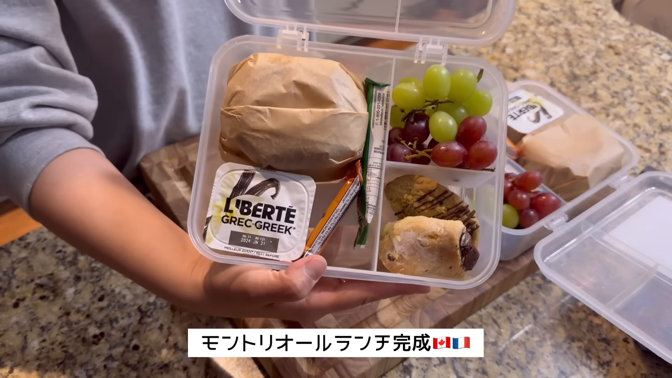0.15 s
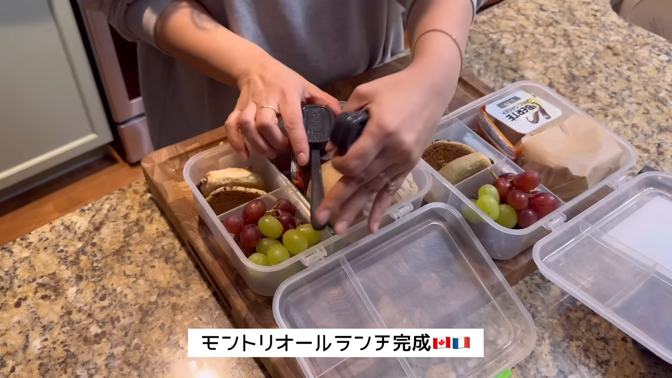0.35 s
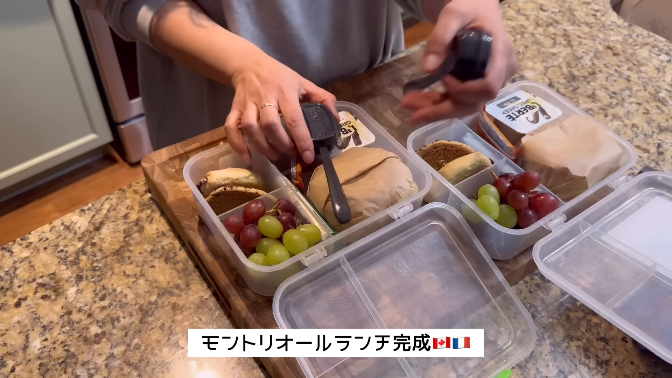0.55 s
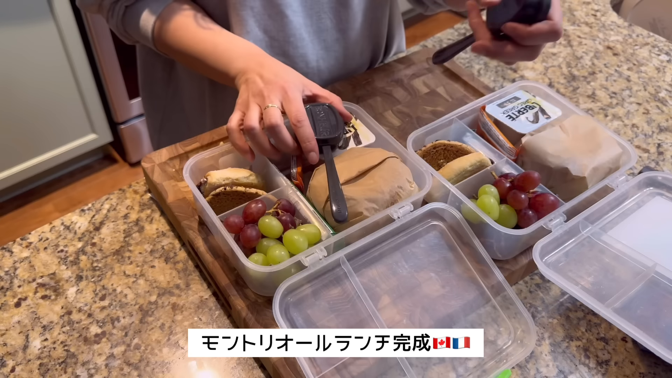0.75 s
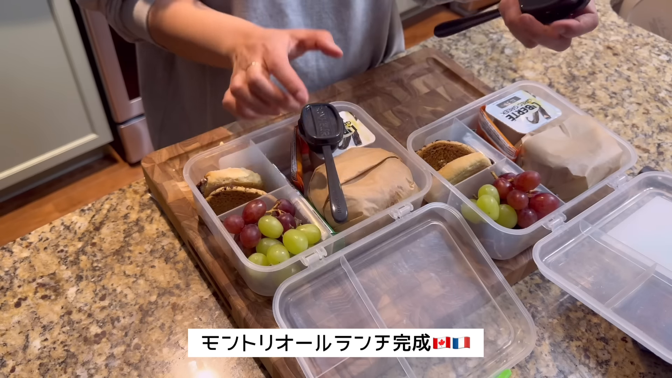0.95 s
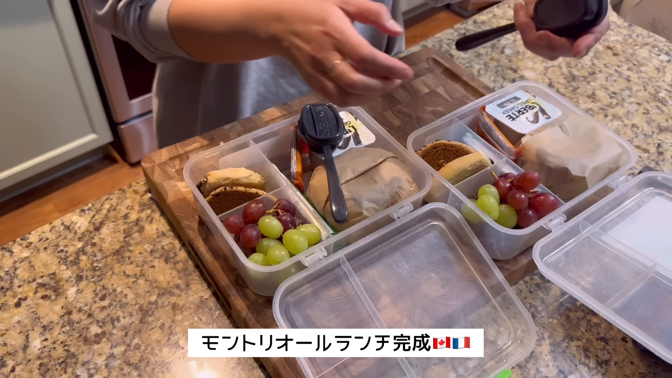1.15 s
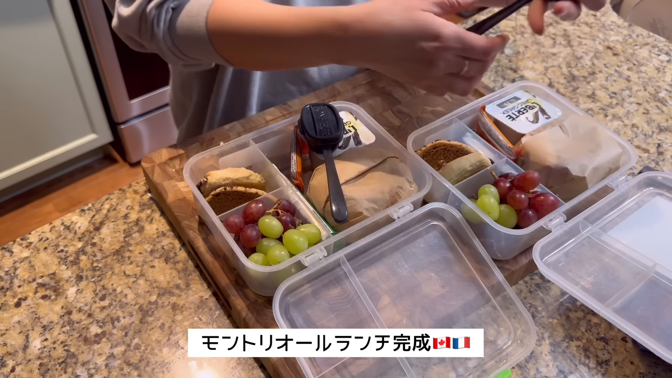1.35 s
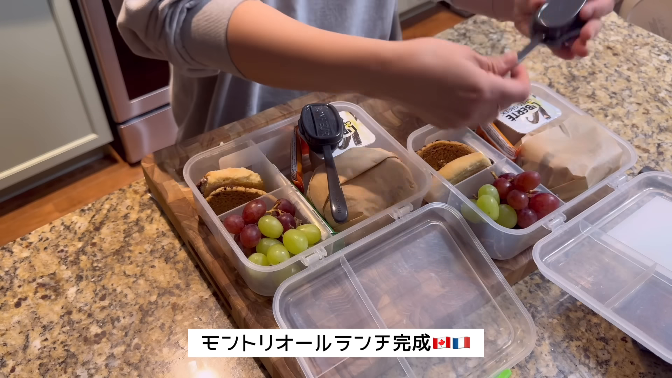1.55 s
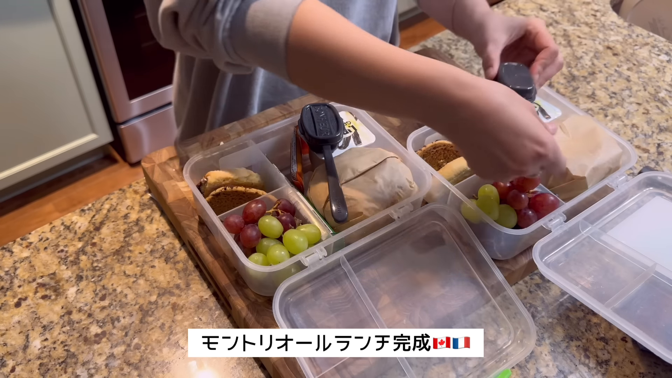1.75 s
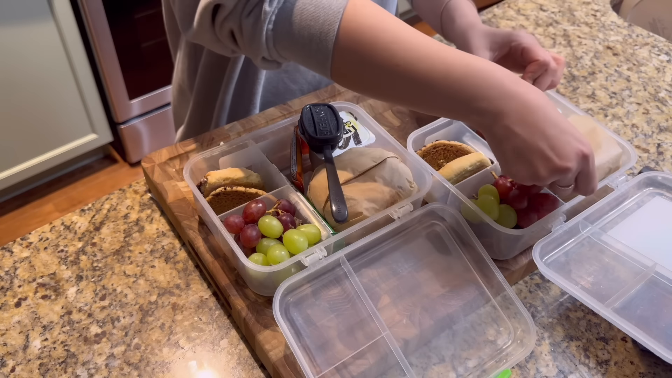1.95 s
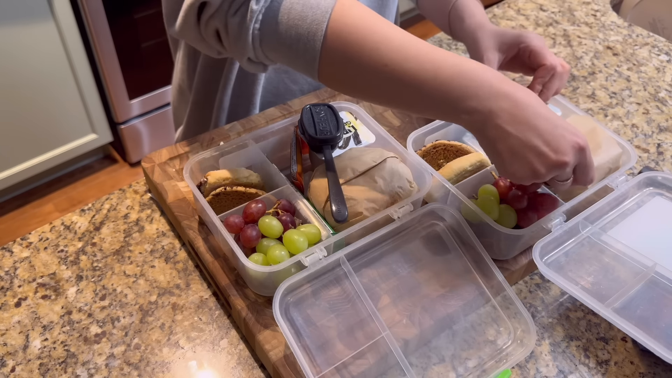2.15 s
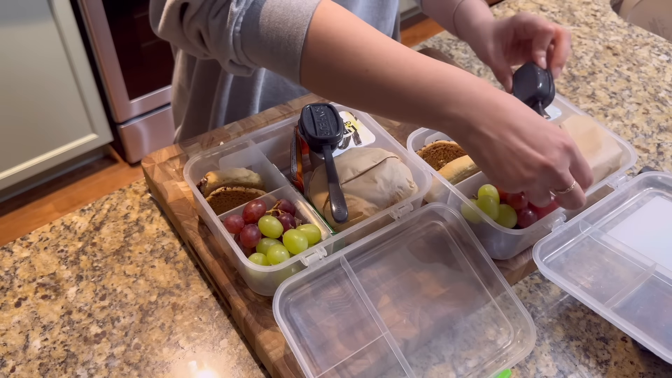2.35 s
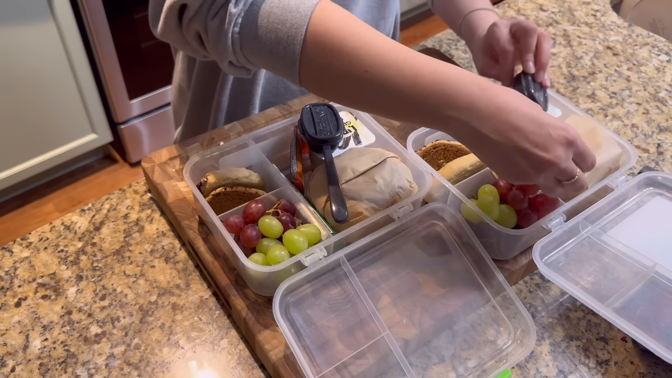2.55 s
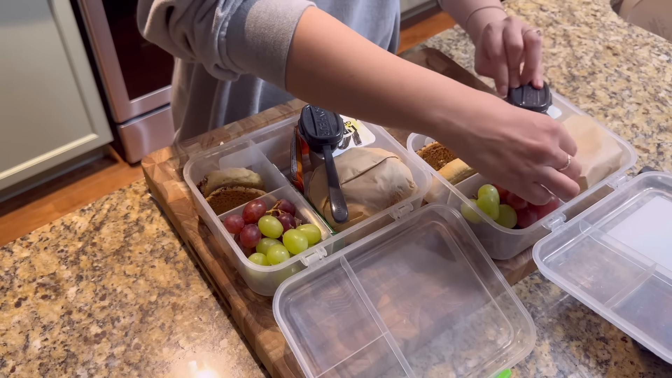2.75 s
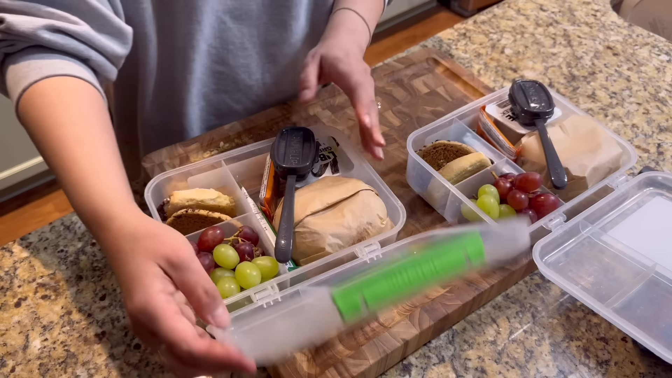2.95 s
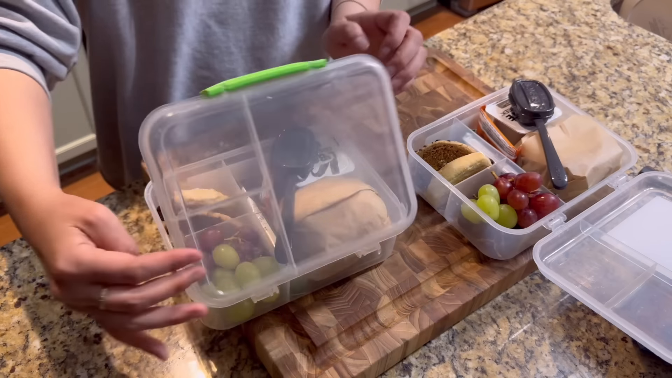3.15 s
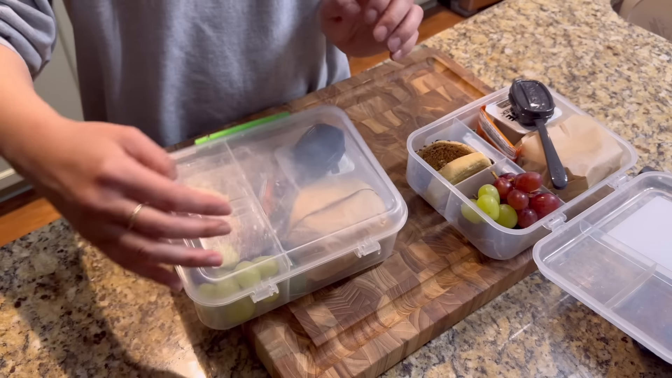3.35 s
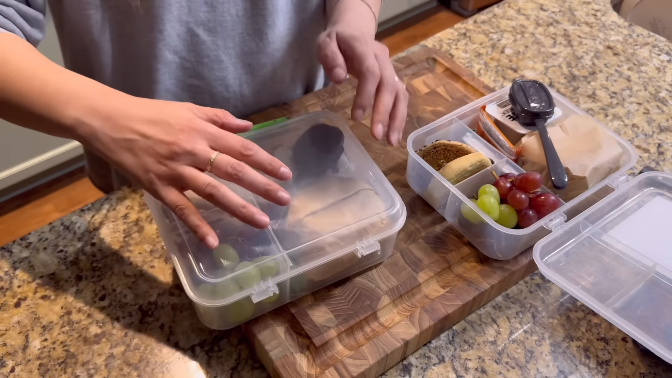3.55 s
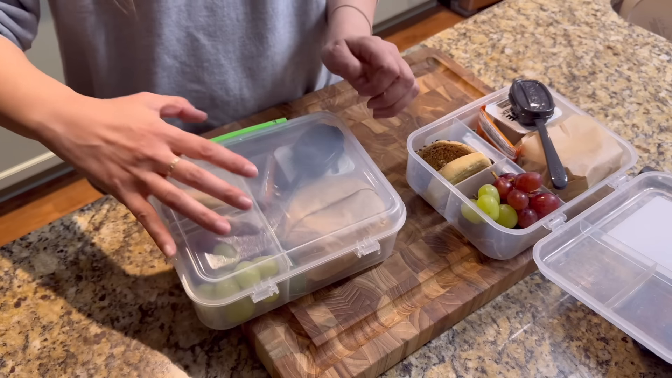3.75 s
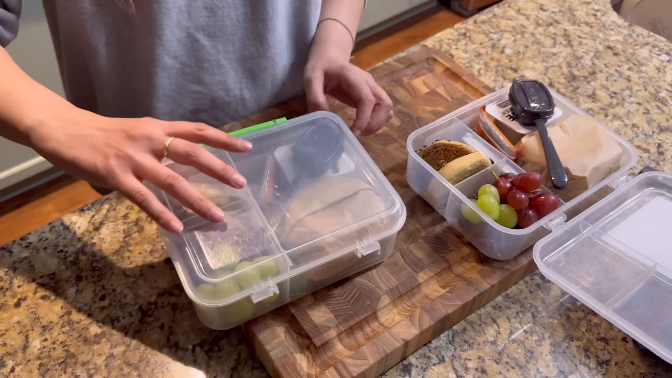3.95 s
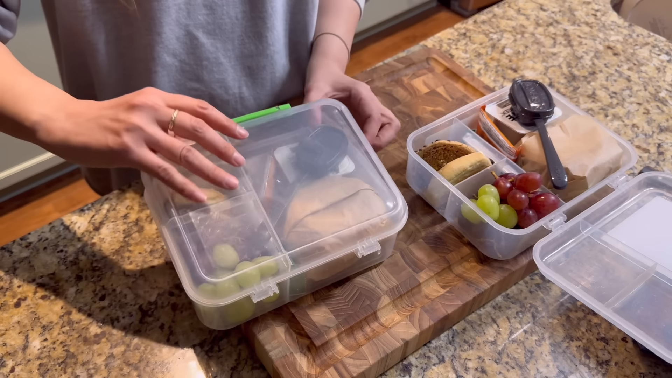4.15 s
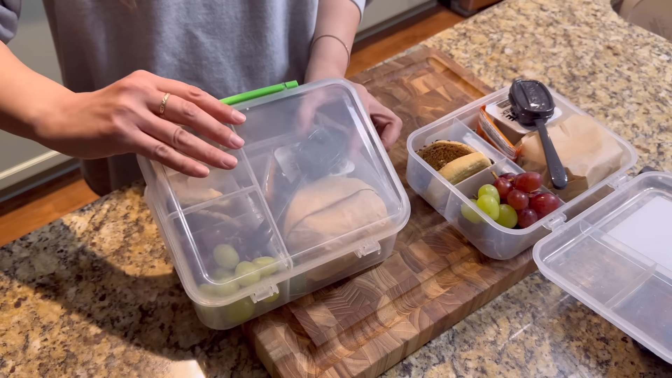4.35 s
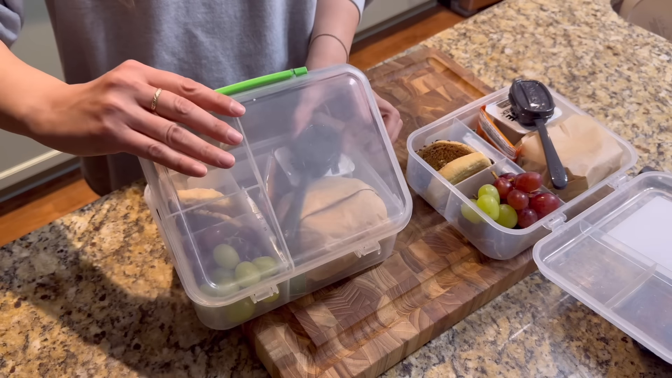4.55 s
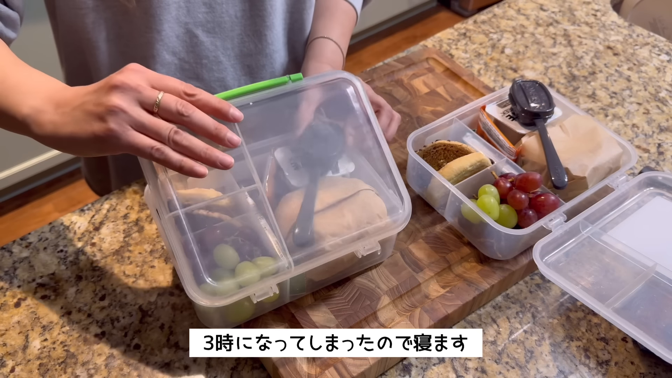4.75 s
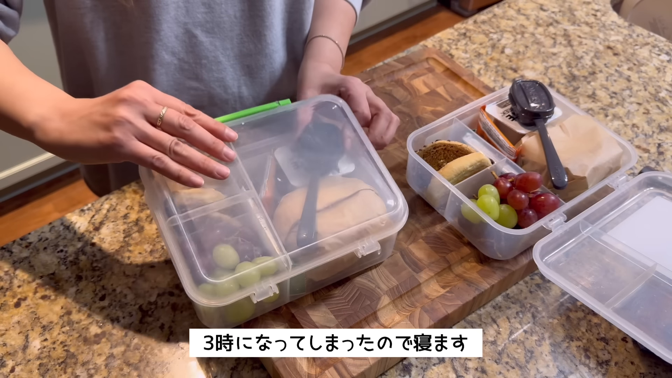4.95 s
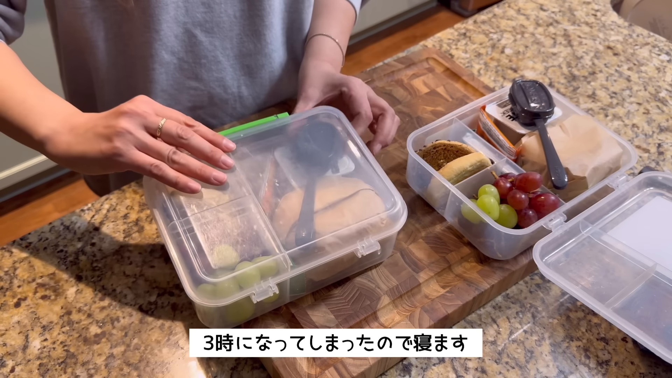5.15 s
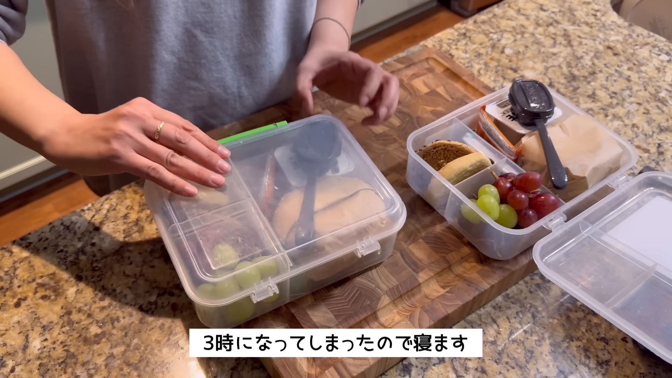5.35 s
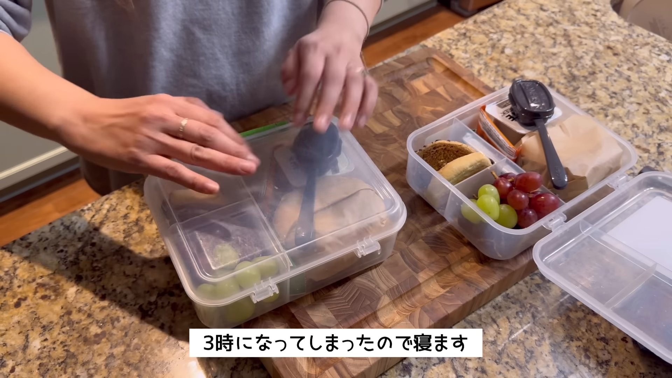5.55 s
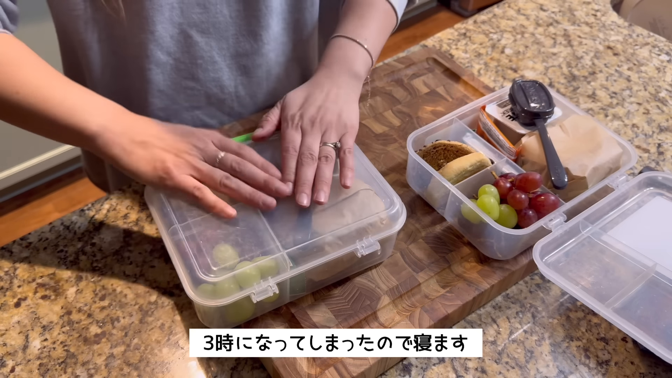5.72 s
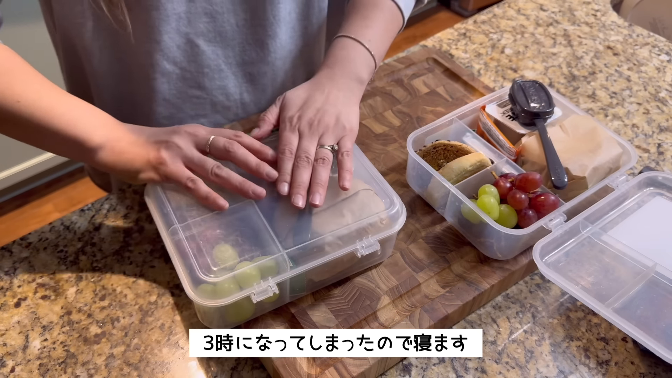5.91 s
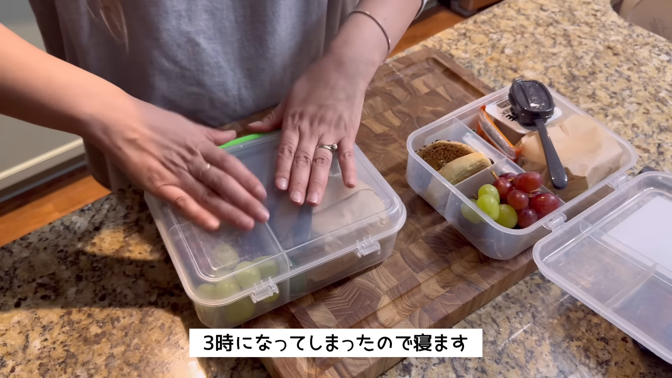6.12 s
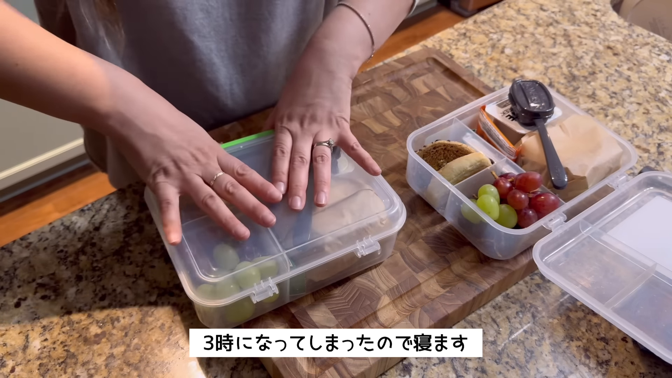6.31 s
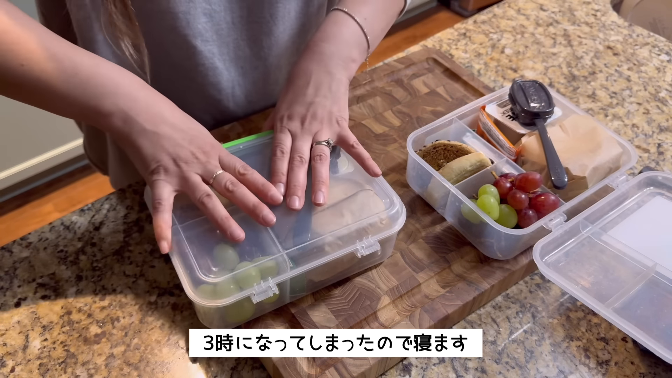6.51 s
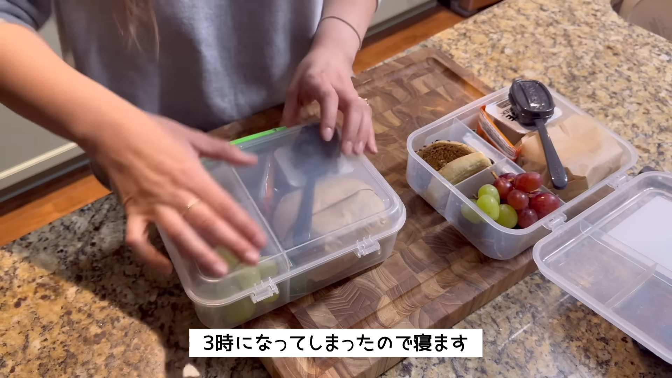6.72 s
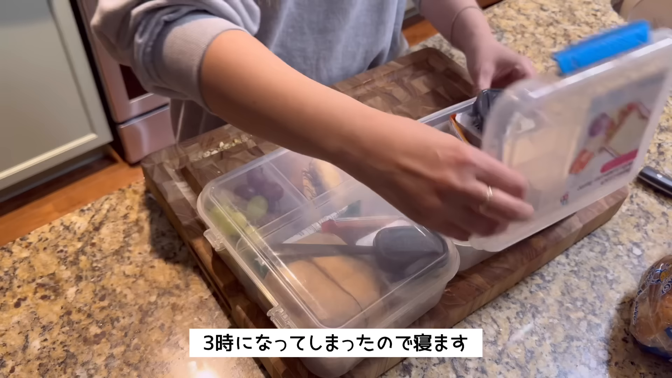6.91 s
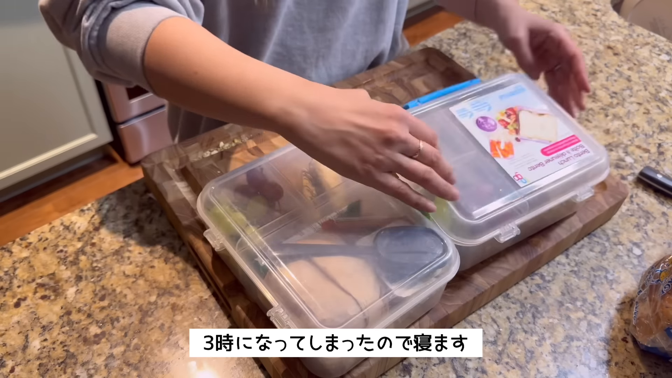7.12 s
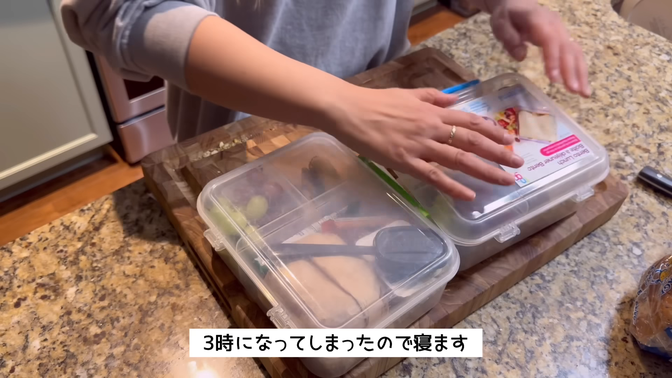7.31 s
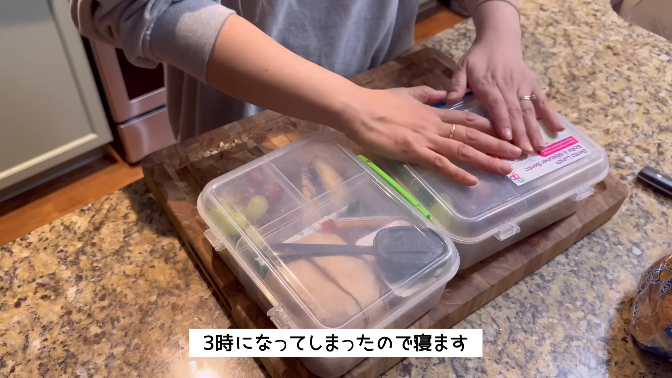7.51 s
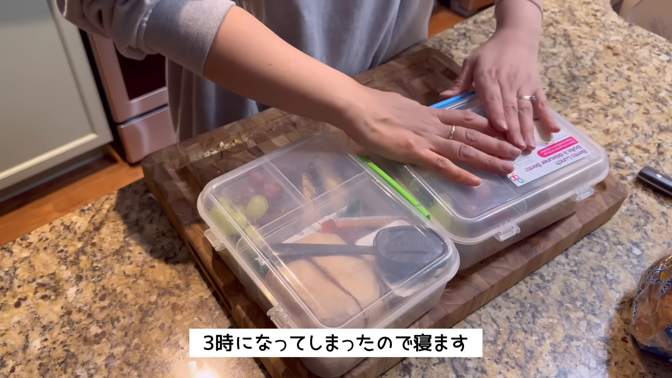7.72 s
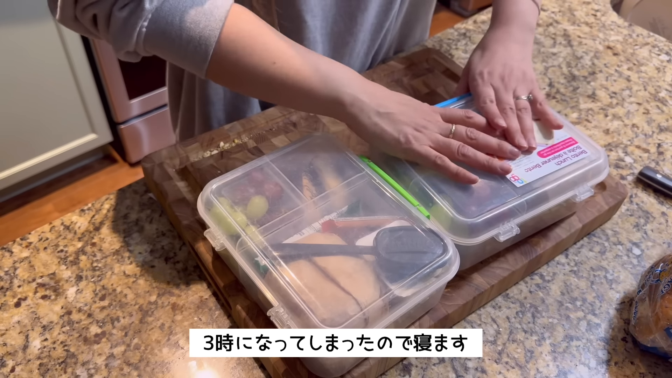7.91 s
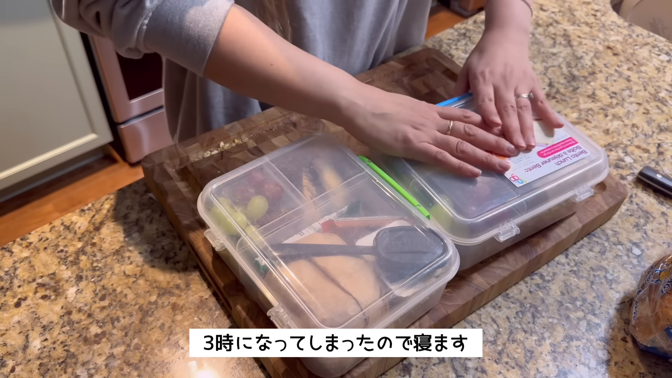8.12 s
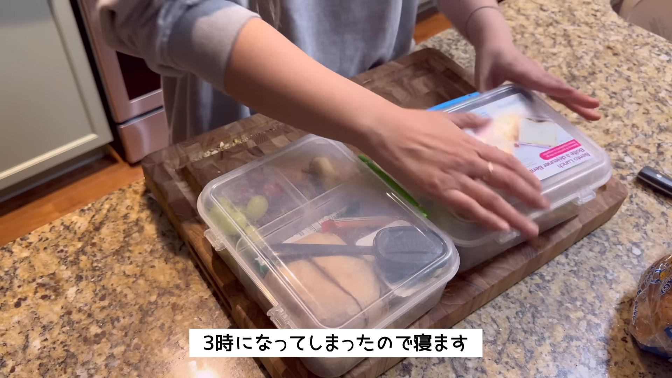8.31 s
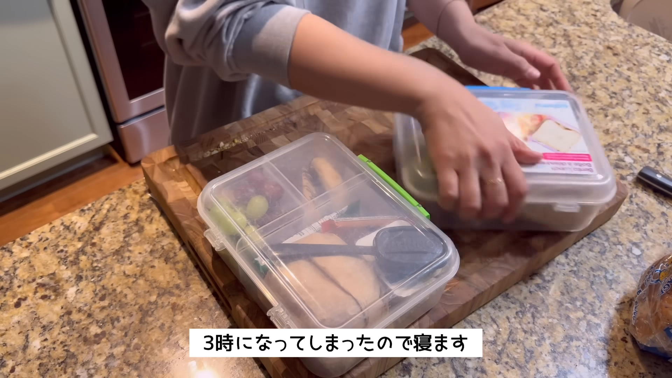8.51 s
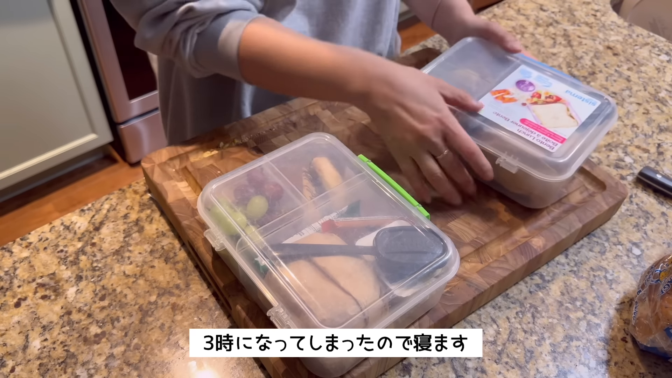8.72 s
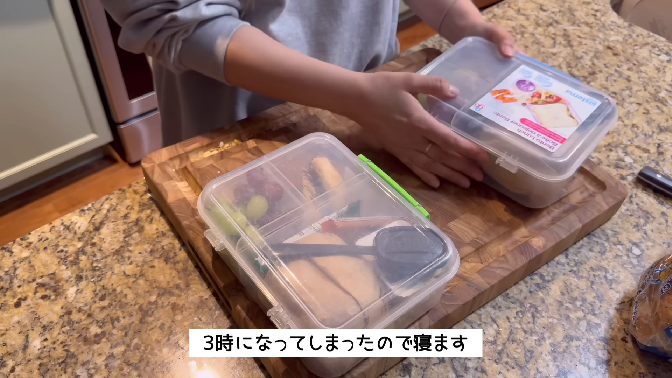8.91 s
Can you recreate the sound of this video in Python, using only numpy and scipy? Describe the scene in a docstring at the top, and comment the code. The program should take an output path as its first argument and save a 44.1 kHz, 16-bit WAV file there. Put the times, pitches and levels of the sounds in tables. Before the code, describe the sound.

For the first three seconds, spoons and small cups are placed into open plastic lunch boxes, making light, irregular taps and ticks with faint scraping. At about 3.3 seconds a lid drops with a sharp, hollow knock and a short clatter. Softer clicks and finger brushing follow, then firmer knocks at 5.4 and 5.7 seconds as the lid is pressed. A latch snaps loudly at 6.4 seconds. A second lid knocks down at 7.1 seconds, clicks around 7.4, and snaps shut just before 8 seconds, leaving a brief plastic ring. From about 8.2 to 9 seconds a box bumps and drags on a wooden board, with dull scrapes and a faint squeak. Everything is heard close up in stereo, in a quiet kitchen whose hard walls add a short echo.

```python
"""Hands set spoons and small cups into open plastic lunch boxes, then drop, press and latch the lids.
Each hit makes plastic ring briefly and adds a sharp tick. Things drag on the wooden board, edges scrape,
fingers brush, high taps leave a brief fuzzy ring, and now and then a lid hums or an edge squeaks.
The quiet, hard-walled kitchen echoes. Two microphones close by hear it all."""
import sys
import numpy as np
from scipy import signal
from scipy.fft import rfft, irfft
from scipy.io import wavfile
from scipy.ndimage import uniform_filter1d

SR = 44100
rng = np.random.default_rng(int(sys.argv[2]) if len(sys.argv) > 2 else 0)


def transcribe(u):
    """Save the signal u as a 16-bit wav file named by the first command-line argument.

    u: samples, shape (n,) or (channels, n), limited to [-1, 1]; the rate is SR.
    q: integer samples, one column per channel.
    """
    v = np.clip(np.atleast_2d(u).T, -1, 1)
    q = np.round(v * 32767).astype(np.int16)
    wavfile.write(sys.argv[1], SR, q)


N = 399987

# Spoon and cup taps. Each row: start in seconds, pitch of the struck panel in Hz, seconds it takes to
# fade by 60 dB, strength in dB, then weight (the lower part) and edge (the tick) in dB above strength.
TAPS = [(0.182, 817, 0.0088, -26.5, -33, -29), (0.2224, 810, 0.0047, -27.5, -31, -15),
        (0.2355, 705, 0.0036, -29.5, -37, -33), (0.2661, 830, 0.0047, -35, -36, -48),
        (0.2857, 800, 0.0055, -35.5, -25, -53), (0.2961, 764, 0.0074, -42, -26, -32),
        (0.3652, 730, 0.014, -39.5, -23, -19), (0.38, 1020, 0.08, -44.5, -26, -8),
        (0.4025, 1210, 0.031, -37, -28, -12), (0.4169, 1050, 0.013, -35.5, -31, -5.5),
        (0.4533, 854, 0.074, -42, -38, -7), (0.4717, 870, 0.008, -44, -27, -4),
        (0.4775, 655, 0.0098, -29, -32, -19), (0.487, 1700, 0.008, -39.5, -1.5, 1),
        (0.641, 796, 0.017, -61, -20, -4), (0.6621, 1500, 0.013, -50, -3.5, -33),
        (0.8265, 1120, 0.012, -67, -10, 4), (0.8491, 1790, 0.0064, -41, -28, -9.5),
        (1.03, 800, 0.02, -81, 2, -10), (1.1428, 1560, 0.021, -40, -11.5, -16),
        (1.1619, 1500, 0.009, -48, -16, -21), (1.2153, 1540, 0.019, -57, 1, -7),
        (1.249, 1420, 0.01, -49.5, -7, 4), (1.2783, 1490, 0.011, -57.5, -0.5, -15),
        (1.3362, 1590, 0.012, -34, -8.5, -3), (1.3433, 675, 0.043, -48, -34, -18),
        (1.379, 1590, 0.013, -41, -5.5, -10), (1.3932, 1320, 0.016, -34.5, -12, -0.5),
        (1.437, 1609, 0.0049, -48, -19, -6), (1.456, 1600, 0.024, -30, -22, -5),
        (1.4946, 1520, 0.02, -40.5, -10, -18), (1.5532, 1730, 0.011, -31, -37, -1),
        (1.6438, 2710, 0.037, -44, -15, 5.5), (1.714, 1680, 0.0089, -48.5, -20, -7),
        (1.861, 686, 0.021, -25.5, -32, -10), (1.9855, 740, 0.012, -45.5, -21, -7),
        (2.0277, 750, 0.018, -26.5, -38, -17.5), (2.0458, 730, 0.033, -39.5, -28, -20),
        (2.067, 1650, 0.013, -36, -4, -8), (2.08, 1500, 0.011, -49, -15, 6.5),
        (2.1, 700, 0.03, -42, -15, -19), (2.1811, 1840, 0.0079, -37.5, -3.5, -6.5),
        (2.1912, 1890, 0.011, -45, -1, -13), (2.2578, 1570, 0.013, -50, -11, -26),
        (2.2874, 1710, 0.028, -38.5, -4, -4.5), (2.3925, 1598, 0.007, -54, -10, -4),
        (2.419, 880, 0.027, -51.5, -26, -2), (2.4512, 2028, 0.014, -41.5, -11, -3),
        (2.4756, 1500, 0.017, -41.5, -7, -17), (2.4962, 1500, 0.022, -42, -9, -19),
        (2.5792, 1114, 0.053, -37, -20, -4.5), (2.6198, 883, 0.038, -31, -31, -19.5),
        (2.6867, 2060, 0.014, -34, -17, -17), (2.6937, 892, 0.054, -35, -35, -19),
        (2.7024, 860, 0.051, -39, -22, -5.5), (2.7456, 1040, 0.016, -34.5, -28, -2),
        (2.7539, 1480, 0.055, -34, -5.5, -8), (2.7599, 640, 0.012, -26.5, -28, -2.5),
        (2.8191, 861, 0.025, -55, -18, -3), (2.878, 850, 0.016, -42, -22, -28),
        (2.9198, 900, 0.046, -52, -24, -1), (2.9719, 910, 0.015, -66.5, -11, 21.5),
        (3.1389, 900, 0.032, -86, 2, 30)]
# Lid, latch and board knocks. Each row reads like a row of TAPS.
KNOCKS = [(3.2543, 475, 0.019, -8.5, -9.5, -0.5), (3.2784, 650, 0.013, -12, -0.5, -19.5),
          (3.3006, 410, 0.013, -27, -4, -15), (3.3234, 623, 0.015, -18.5, -16, -20.5),
          (3.3542, 633, 0.069, -28.5, -7, -64), (3.3776, 556, 0.066, -20.5, -4.5, -11.5),
          (3.3929, 580, 0.015, -17.5, -27, -37.5), (3.4697, 620, 0.03, -22.5, -8, -23),
          (3.485, 500, 0.02, -28.5, -8, -30), (3.5073, 472, 0.14, -28, -12.5, -20),
          (3.5196, 490, 0.049, -37.5, 9, -26), (3.582, 425, 0.048, -42.5, -6, -35.5),
          (3.645, 450, 0.015, -47.5, 3.5, -36.5), (3.9361, 479, 0.028, -48.5, -11, -7),
          (3.9865, 437, 0.09, -45, -15, -25), (3.9964, 590, 0.021, -38, -28, -16),
          (4.0161, 485, 0.061, -37, -15, -20), (4.0335, 840, 0.023, -37.5, -26, -8),
          (4.0638, 437, 0.081, -32.5, -11.5, -24), (4.1091, 454, 0.054, -33.5, -9.5, -27),
          (4.1219, 462, 0.043, -42.5, -13, -31), (4.1882, 1265, 0.025, -36.5, -5, -8),
          (4.195, 615, 0.0088, -34.5, -0.5, -24), (4.3769, 737, 0.037, -50.5, -27, -14.5),
          (4.3919, 650, 0.022, -40.5, -22, -9), (4.4134, 1630, 0.027, -41, -17, -6),
          (4.4671, 1070, 0.0095, -46.5, -24, -10), (4.5374, 1570, 0.005, -31.5, -8, -10.5),
          (4.5646, 730, 0.019, -39.5, -34, -7), (4.6575, 690, 0.056, -42.5, -36, -6.5),
          (4.6977, 1504, 0.028, -33.5, -14, -1.5), (4.769, 1290, 0.0027, -43, -21, -8),
          (4.7914, 1106, 0.014, -45, -12.5, 4.5), (4.82, 1753, 0.008, -48, -17, 2),
          (4.8619, 1351, 0.0058, -58, 2.5, -10), (4.8692, 695, 0.074, -51, -14.5, 10),
          (5.0402, 478, 0.039, -43.5, -15, -21), (5.1131, 496, 0.024, -51, -15, -15.5),
          (5.164, 457, 0.049, -47, -25, -5), (5.2659, 572, 0.049, -42.5, -14, -16),
          (5.32, 576, 0.025, -57, -13.5, -21), (5.3649, 594, 0.022, -18.5, -5, -8.5),
          (5.4003, 412, 0.016, -38.5, 3, -58), (5.6784, 409, 0.026, -43.5, 1, -11),
          (5.692, 550, 0.075, -19.5, -9.5, -5.5), (5.701, 276, 0.013, -18.5, 8.5, -19.5),
          (5.7079, 604, 0.016, -14, -18.5, -7), (5.7679, 684, 0.018, -44.5, -7, -16.5),
          (5.8771, 530, 0.0065, -45.5, -0.5, -8.5), (6.0879, 204, 0.044, -73.5, 25, 6),
          (6.1354, 1450, 0.015, -38, -5, 0), (6.147, 1170, 0.0098, -20.5, 1.5, -2),
          (6.2982, 390, 0.03, -37, 6.5, -5), (6.3178, 520, 0.047, -43.5, -15.5, -10),
          (6.329, 890, 0.046, -44, -10, 6.5), (6.344, 920, 0.051, -50, -4, 1.5),
          (6.3673, 753, 0.0078, -51.5, -9.5, 19.5), (6.3759, 700, 0.011, -8.5, -12, -5.5),
          (6.3835, 444, 0.1, -33.5, 8, -10.5), (6.4069, 716, 0.01, -11, -8.5, 6),
          (6.4135, 388, 0.0065, -17, -6, -21.5), (6.5617, 172.5, 0.03, -47.5, 2.5, -9),
          (6.5943, 970, 0.0078, -34.5, 0.5, -8), (6.6012, 440, 0.06, -41.5, -12, 4),
          (6.6102, 410, 0.013, -34, -9.5, 2.5), (6.63, 960, 0.021, -37, -0.5, -1),
          (6.6513, 1390, 0.006, -41.5, -21, 12.5), (6.6668, 320, 0.017, -40, -1, -4),
          (6.7449, 243, 0.012, -56, 17, 12.5), (6.7981, 173, 0.05, -71, 32, 9),
          (6.8108, 188, 0.032, -79, 18, 14), (6.837, 380, 0.021, -41, 3, -11.5),
          (6.8476, 320, 0.021, -43, 6.5, -8), (6.8769, 356, 0.031, -43.5, 4.5, 1),
          (6.9428, 1240, 0.018, -39.5, -4, -8), (7.048, 690, 0.034, -42, -11, 7),
          (7.0662, 1824, 0.013, -42, 0, -13), (7.0848, 580, 0.0095, -25, -6.5, -42),
          (7.0966, 653, 0.074, -21.5, -18.5, -9), (7.1071, 366, 0.009, -6, -4, -6),
          (7.219, 412, 0.0044, -25.5, -8.5, -22), (7.2373, 583, 0.0051, -33.5, -16, -27),
          (7.3726, 455, 0.0043, -28.5, -16.5, -15), (7.4076, 870, 0.045, -21, -2, -1.5),
          (7.4379, 870, 0.0058, -25.5, 8.5, -16.5), (7.4516, 916, 0.039, -20.5, -10, 8),
          (7.475, 1010, 0.046, -34, -11, 7), (7.4813, 270, 0.0065, -33.5, 12, -10),
          (7.6068, 957, 0.044, -39.5, -13, -12), (7.7164, 950, 0.0053, -33, -7.5, -5.5),
          (7.8155, 952, 0.0099, -32.5, -7.5, -8.5), (7.8578, 689, 0.033, -12, -9.5, -1.5),
          (7.8729, 498, 0.029, -15, -20, -15), (7.9624, 1033, 0.018, -13, -40, 11.5),
          (7.9729, 1102, 0.11, -20, -36.5, 2.5), (8.181, 870, 0.026, -36.5, -11, -7),
          (8.2114, 345, 0.019, -36, -1.5, -7), (8.2482, 247, 0.01, -52, 10, -9),
          (8.2949, 275, 0.026, -43.5, 13, 4), (8.3543, 287, 0.027, -35, 3, -8),
          (8.3748, 198, 0.02, -42.5, 10, -2), (8.4785, 236, 0.097, -43, -3, 9.5),
          (8.5005, 540, 0.021, -25, 1, 0.5), (8.5305, 152, 0.069, -44, -7, -4),
          (8.5848, 221, 0.027, -32, 8.5, -7), (8.6255, 2300, 0.0072, -25, -29, -0.5),
          (8.7214, 355, 0.038, -42, 3.5, -4), (8.8001, 280, 0.026, -58, 14.5, -4),
          (8.8243, 322, 0.045, -56, 8, 2), (8.9759, 262, 0.065, -54.5, 11, -20.5),
          (8.9937, 860, 0.019, -39.5, 3, 1.5)]
THUD_TOP_HZ, BODY_TOP_HZ = 400, 1200  # a hit has a low thud, a middle body and, above that, a click


def cup_and_spoon_taps():
    """Cups and spoons land in the boxes and ring at their own natural tones, called modes."""
    # Each row: pitch in Hz, width in Hz (wider dies sooner), level in dB.
    cup_modes = [(197.4, 110, 2), (330, 100, 11), (730, 53, -6.5), (870, 140, -19), (1060, 220, 3),
                 (1530, 75, -4), (1730, 31, -8.5), (2074, 160, 0), (2650, 79, -14), (2634, 92, -4.5),
                 (3250, 260, 2.5), (3800, 880, -10), (4250, 160, -11), (4260, 120, -10.5)]
    return hits(TAPS, cup_modes, panel_db=6.2, free_ring_s=0.015, scatter_db=2.5, detune=0.054,
                tick_s=0.00079, touch_s=0.0014, walls_db=-1.1)


def lid_knocks():
    """Dropping, pressing and latching a lid rings the box, the lid and the board."""
    # Each row: pitch in Hz, width in Hz, level in dB.
    box_modes = [(64, 19, -5), (125, 13, -12), (186, 32, -13.5), (303, 63, -4), (317.3, 70, 1),
                 (449.2, 39, -6), (543, 59, -11.5), (770, 133, 0.5), (952, 73, -7), (1033, 290, -7.5),
                 (1364, 82, -2.5), (1756, 160, 0), (2086, 253, 3.5), (2460, 86, -5.5), (3070, 65, -8),
                 (3130, 780, -10.5), (3750, 190, -29), (3930, 85, -15), (3880, 360, -2)]
    return hits(KNOCKS, box_modes, panel_db=8.6, free_ring_s=0.023, scatter_db=3.5, detune=0.048,
                tick_s=0.00097, touch_s=0.00072, walls_db=0.4)


def hits(events, modes, panel_db, free_ring_s, scatter_db, detune, tick_s, touch_s, walls_db):
    """Each hit rings a panel and the modes, and ticks. Returns left, right and the sound to the walls."""
    # The tone of the tick. Each row: pitch in Hz, level in dB.
    tick_tone = [(3000, 4.5), (4600, 4.5), (6500, -2), (8000, 1), (11000, 1), (14500, -1), (16500, -19.5)]
    t, out = np.arange(2048) / SR, np.zeros((3, N))
    bright = gain_of(at_pitch(tick_tone, np.fft.rfftfreq(len(t), 1 / SR)))
    snap = np.roll(irfft(bright, len(t)), 32)
    for start, panel_hz, ring_s, strength_db, weight_db, edge_db in events:
        sway_db = -0.5 * rng.standard_normal()  # hits fall to either side of the hands
        # Heavy or blunt hits stay in contact longer.
        contact_s = touch_s * gain_of(0.17 * (strength_db + 29) - 0.13 * (edge_db + 14.5))
        hz, width, mode_db = np.transpose(modes + [(panel_hz, 0, panel_db)])[:, :, None]
        width = width * (free_ring_s / ring_s) ** 0.86  # a grip on the panel damps every mode
        width = np.minimum(width, 0.3 * hz)  # even a held panel swings a few times
        width[-1] = np.log(1000) / np.pi / ring_s  # the last mode is the struck panel
        uneven, shift, phase = rng.standard_normal((3, len(hz), 1))
        uneven[-1] = shift[-1] = 0
        far_db = 2.3 * abs(np.log2(hz / panel_hz))  # modes far from the panel's pitch get less
        rise = t / (0.75 * contact_s + 0.063 / hz)  # low modes take longer to start
        turns = hz * (1 + detune * shift) * t + phase  # fingers and contents pull each pitch a little
        swing = (1 - (1 + rise) * np.exp(-rise)) * np.sin(2 * np.pi * turns) * gain_of(mode_db - far_db)
        fizz = irfft(rfft(rng.standard_normal(len(t))) * bright, len(t))
        tick = fizz * (1 - np.exp(-t / contact_s)) * np.exp(-t / (0.41 * contact_s + tick_s))
        near = [*into_air(hz, swing * gain_of(scatter_db * uneven) * np.exp(-np.pi * width * t)), tick]
        # All directions together have blunter peaks than any one of them.
        around = [*into_air(hz, swing * np.exp(-np.pi * (width + 0.18 * hz) * t)), snap]
        direct = walls = 0
        for db, part, spread in zip(part_levels(panel_hz, strength_db, weight_db, edge_db), near, around):
            part = gain_of(db) * part / abs(part).max()
            direct += part
            walls += spread * np.linalg.norm(part) / np.linalg.norm(spread)
        add(out, start - 0.0011, np.vstack([placed(direct, start, sway_db), gain_of(walls_db) * walls]))
    return out


def part_levels(panel_hz, strength_db, weight_db, edge_db):
    """Thud, body, click and tick in dB. Strength sets a high panel's click or a low panel's body."""
    if panel_hz > BODY_TOP_HZ:
        return strength_db + np.array([-14 + 3.6 * weight_db, weight_db, 0, edge_db])
    return strength_db + np.array([weight_db, 0, -3 + 0.51 * edge_db, edge_db])


def into_air(hz, swings):
    """Sums the modes into thud, body and click. Small panels give off little below their lowest mode."""
    groups = np.searchsorted((THUD_TOP_HZ, BODY_TOP_HZ), hz[:, 0]) == np.arange(3)[:, None]
    return [signal.lfilter(*signal.butter(3, lowest_hz, "high", fs=SR), part)
            for lowest_hz, part in zip((160, 380, 1050), groups @ swings)]


def placed(sound, start, sway_db):
    """A hit off to one side reaches the two microphones with different level and timing."""
    # Where the hands work. Each row: time in seconds, lean to the left in dB.
    hands = [(0.1, 1), (0.9, 2.5), (1.4, -2), (2.9, -1), (3.2, 2.5), (5.0, 1.5), (6.9, 3), (7.0, -1),
             (7.8, .6), (9.0, -1)]
    # Each row: pitch in Hz, dB between left and right for each dB of lean.
    level_gap = [(100, .1), (400, .9), (1500, 3.3), (6000, .6)]
    # Each row: pitch in Hz, radians the nearer microphone is ahead for each dB of lean.
    lead = [(150, .03), (500, .12), (1200, .15), (1900, .3), (2800, .5), (4500, .45), (7000, -.1),
            (9000, 0)]
    hz = np.fft.rfftfreq(len(sound), 1 / SR)
    lean_db = np.interp(start, *np.transpose(hands)) + sway_db
    side = gain_of(at_pitch(level_gap, hz) / 2) * np.exp(0.5j * at_pitch(lead, hz))
    return irfft(rfft(sound) * side ** np.array([[lean_db], [-lean_db]]), len(sound))


def rubbing():
    """Grainy noise: a dull drag on the board, scraping edges and brushing fingers, plus the hits' tails."""
    # The tone of each kind of rubbing. Each row: pitch in Hz, level in dB.
    drag_tone = [(40, -36.5), (120, -10), (330, 9), (600, 5), (1000, -10.5), (2500, -44)]
    scrape_tone = [(400, -23), (1000, 6), (1700, -1.5), (2400, -4.5), (4000, -15.5), (7000, -31.5)]
    brush_tone = [(2000, -11.5), (4500, 8), (6500, 0), (8000, 6), (11000, 13), (14500, 9.5), (16500, -1.5)]
    power = noise_swells() + hit_tails(TAPS, (-38, -30, -35)) + hit_tails(KNOCKS, (-22, -27, -45))
    drag, scrape, brush = np.sqrt(power)
    grain, crinkle = evened(uniform_filter1d(rng.standard_normal((2, N)), size=200, axis=1))
    drag *= gain_of(2.1 * grain)
    scrape *= gain_of(1.4 * grain + 0.57 * crinkle)
    brush *= gain_of(1.4 * grain + 0.86 * crinkle)
    return (drag * noise(drag_tone, size=512) + scrape * noise(scrape_tone, size=256)
            + brush * noise(brush_tone, size=256, patchy_db=1.8))


def noise_swells():
    """Power of swells of noise: long ones are rubbing, very short ones are the crunch of heavy knocks."""
    # Each row: start, strongest moment and end in seconds, then low, middle and bright levels in dB.
    swells = [(.36, 0.495, 0.58, -82, -54.5, -62.5), (.79, 0.838, 0.86, -84, -71, -69.5),
              (1.05, 1.15, 1.24, -82.5, -88, -72), (1.35, 1.46, 1.87, -77, -81, -64),
              (1.6, 1.86, 1.9, -75, -86, -86), (1.863, 1.913, 2.01, -62.5, -53, -84),
              (1.997, 2.04, 2.22, -60, -52, -69), (2.162, 2.193, 2.32, -70, -68, -75),
              (2.41, 2.475, 2.54, -88, -58, -63), (2.69, 2.754, 2.85, -73, -43.5, -67),
              (2.9, 2.943, 3.05, -77, -57, -67.5), (3.09, 3.134, 3.19, -87, -73, -70),
              (3.25, 3.254, 3.275, -33, -24, -36), (3.3, 3.502, 3.62, -48.5, -61, -76.5),
              (3.94, 4.052, 4.14, -52, -57, -60), (4.37, 4.381, 4.49, -62.5, -56, -74),
              (4.5, 4.55, 4.61, -69, -53, -62), (4.62, 4.84, 4.95, -74, -59.5, -66),
              (5.1, 5.183, 5.3, -61.5, -60.5, -69), (5.28, 5.351, 5.38, -60, -61, -72.5),
              (5.68, 5.69, 5.705, -32, -38, -44), (5.9, 6.13, 6.2, -63.5, -70, -60.5),
              (6.26, 6.298, 6.38, -48.5, -54, -62), (6.4, 6.395, 6.52, -44, -29.5, -73.5),
              (6.54, 6.612, 6.52, -63, -45, -55.5), (6.8, 6.939, 6.95, -50.5, -54, -50.5),
              (6.97, 7.066, 7.1, -62, -62.5, -57.5), (7.103, 7.103, 7.115, -32, -12, -24),
              (7.36, 7.368, 7.39, -40.5, -41.5, -55), (7.396, 7.405, 7.43, -27, -25, -42),
              (7.56, 7.663, 7.72, -64, -62, -66.5), (7.708, 7.737, 7.9, -53, -61, -75),
              (7.952, 7.97, 8.12, -59, -28.5, -49.5), (8.14, 8.277, 8.44, -49.5, -53, -54),
              (8.44, 8.582, 8.74, -47, -45.5, -44), (8.579, 8.58, 8.6, -39, -56.5, -59),
              (8.72, 8.788, 8.9, -60.5, -72, -65), (8.95, 9.04, 9.2, -66, -57, -62)]
    t = np.arange(0, N + 32, 32) / SR
    start, top, end, *levels_db = np.transpose(swells)[:, :, None]
    powers = gain_of(2 * np.array(levels_db)[:, :, 0]) @ swell(t, start, top, end) ** 2
    return np.array([np.interp(np.arange(N) / SR, t, power) for power in powers])


def hit_tails(events, offsets_db):
    """Each hit leaves a short, fading tail of low, middle and bright noise. Returns the power of each."""
    kicks = np.zeros((3, N))
    for start, panel_hz, _, *levels_db in events:
        thud, body, click, tick = gain_of(2 * part_levels(panel_hz, *levels_db))
        power = np.array([thud + gain_of(-14) ** 2 * body, body + click, tick])
        add(kicks, start, (power * gain_of(offsets_db) ** 2)[:, None])
    return np.array([dying_away(kick, db_per_s) for kick, db_per_s in zip(kicks, (-170, -150, -120))])


def tap_afterring():
    """After the first second, high taps leave a brief fuzzy ring at three pitches."""
    # Each row: pitch in Hz, width in Hz, level in dB.
    rings = [(1590, 130, 1), (2970, 280, -4.5), (4490, 590, -6)]
    kicks, from_s = np.zeros((len(rings), N)), 1
    for start, panel_hz, _, strength_db, *_ in TAPS:
        uneven_db = 2.5 * rng.standard_normal((len(rings), 1))  # each tap favours other pitches
        if panel_hz > BODY_TOP_HZ and start > from_s:
            add(kicks, start, gain_of(strength_db - 24.5 + uneven_db) ** 2)
    fades = np.sqrt(dying_away(kicks, db_per_s=-260))
    return sum(fade * gain_of(db) * fuzzy(hz, width) for fade, (hz, width, db) in zip(fades, rings))


def hums_and_squeaks():
    """A lid hums after its latch shuts, or an edge squeaks on the board."""
    # Each row: start, strongest moment and end in seconds, pitch in Hz, width in Hz, level in dB.
    hums = [(6.408, 6.444, 6.54, 1110, 260, -37.5), (7.047, 7.066, 7.08, 1950, 300, -51.5),
            (7.96, 7.964, 8.13, 1095, 220, -32), (7.962, 7.98, 8.04, 2890, 350, -30),
            (8.426, 8.48, 8.52, 2030, 400, -49.5), (8.553, 8.622, 8.71, 2280, 350, -44.5)]
    t = np.arange(N) / SR
    return sum(gain_of(db) * swell(t, start, top, end) * fuzzy(hz, width)
               for start, top, end, hz, width, db in hums)


def kitchen_echo(sound):
    """Hard walls send back many small echoes, and each pitch dies away at its own speed."""
    # Each row: pitch in Hz, seconds to fade by 60 dB.
    fade_times = [(100, 0.6), (300, 0.087), (700, 0.56), (1800, 0.29), (5000, 0.43), (13000, 0.26)]
    # Each row: pitch in Hz, echo level in dB.
    echo_levels = [(100, -8.5), (400, -7), (1200, -9.5), (4000, -4.5), (12000, -8.5)]
    echoes = np.zeros((2, SR))
    arrivals = np.arange(200, SR - 20, 20) + rng.integers(0, 20, (2, (SR - 201) // 20))
    np.put_along_axis(echoes, arrivals, rng.choice([-1., 1.], arrivals.shape), 1)
    hz, t, bands = signal.stft(echoes, SR, nperseg=256)
    bands = paired(*bands, hz) * gain_of(-60 * t / at_pitch(fade_times, hz)[:, None])
    bands /= np.linalg.norm(bands, axis=2).mean(0)[:, None]  # give every band the same energy
    scale = np.linalg.norm(signal.istft(bands[0], SR, nperseg=256)[1])
    tail = signal.istft(bands * gain_of(at_pitch(echo_levels, hz))[:, None], SR, nperseg=256)[1] / scale
    return signal.fftconvolve(sound[None], tail, axes=1)[:, :N]


def room_hush():
    """The quiet room gives a faint low rumble and hiss."""
    # Each row: pitch in Hz, level in dB compared with the other rows.
    hush_tone = [(25, -23.5), (40, -4), (60, 18), (85, -2.5), (125, 7), (220, -1.5), (400, -2),
                 (700, -15.5), (1800, -13), (4000, -23.5), (8000, -26.5), (12000, -16.5), (16500, -27.5)]
    return gain_of(-74.5) * noise(hush_tone, size=2048)


def noise(tone, size, patchy_db=3):
    """Stereo noise with drifting louder and softer patches, built in frames of `size` samples."""
    frames, hz = 4 * N // size + 5, np.fft.rfftfreq(size, 1 / SR)
    a, b, c, d, patches = rng.standard_normal((frames, len(hz), 5)).T
    patches = evened(uniform_filter1d(uniform_filter1d(patches, size=6, axis=0), size=6, axis=1))
    level_db = at_pitch(tone, hz)[:, None] + patchy_db * patches
    bands = paired(a + 1j * b, c + 1j * d, hz) * gain_of(level_db)
    return evened(signal.istft(bands, nperseg=size, noverlap=3 * size // 4)[1][:, :N])


def fuzzy(hz, width):
    """Noise narrowed around one pitch, partly alike on the left and right."""
    a, b = rng.standard_normal((2, N))
    peak = signal.iirpeak(hz, hz / width, SR)
    return evened(signal.lfilter(*peak, signal.lfilter(*peak, [a, 0.68 * a + 0.64 * b])))


def paired(a, b, hz):
    """Blends two unrelated spectra into left and right, as alike as the microphone spacing makes them."""
    # Each row: pitch in Hz, likeness from 0 to 1.
    likeness = [(60, 0.94), (250, .9), (600, 0.06), (1500, 0.15), (4000, 0.51), (8000, 1), (13000, 1)]
    same = at_pitch(likeness, hz)[:, None]
    return np.array([a, same * a + np.sqrt(1 - same ** 2) * b])


def swell(t, start, top, end):
    """A gain that peaks at `top` and is 16 dB lower at `start` and `end`."""
    return gain_of(-16 * np.maximum((top - t) / abs(top - start), (t - top) / abs(end - top)))


def dying_away(kicks, db_per_s):
    """Gives each kick of power a fading tail."""
    return signal.lfilter([1], [1, -gain_of(2 * db_per_s / SR)], kicks)


def gain_of(db):
    return 10 ** (np.asarray(db) / 20)


def evened(x):
    return x / np.sqrt(np.mean(x ** 2) + 1e-20)


def at_pitch(table, hz):
    pitches, values = np.transpose(table)
    return np.interp(np.log(hz + 1), np.log(pitches + 1), values)


def add(mix, start_s, sound):
    part = mix[:, round(start_s * SR):][:, :sound.shape[1]]
    part += sound[:, :part.shape[1]]


def scene():
    """Taps and knocks with their echo, then the softer sounds."""
    clatter = cup_and_spoon_taps() + lid_knocks()
    in_kitchen = clatter[:2] + kitchen_echo(clatter[2])
    return in_kitchen + rubbing() + tap_afterring() + hums_and_squeaks() + room_hush()


def record(dry):
    """Cuts deep bass and the very top; offsets high treble between left and right, widening the ticks."""
    lag_above_hz, lag_s = 8050, 0.00032
    bass_hz, top_hz, ceiling = 40.7, 16900, 1.3
    hz = np.fft.rfftfreq(N, 1 / SR)
    turn = np.exp(-1j * np.pi * lag_s * np.maximum(hz - lag_above_hz, 0))
    sound = irfft(rfft(dry) * np.array([turn, 1 / turn]), N)
    sound = signal.sosfilt(signal.butter(3, bass_hz, "high", fs=SR, output="sos"), sound)
    sound = ceiling * np.tanh(sound / ceiling)  # the hardest snaps round off
    return signal.oaconvolve(sound, signal.firwin(511, top_hz, window=("kaiser", 9), fs=SR)[None], "same")


dry = scene()
out = record(dry)
transcribe(out)
```